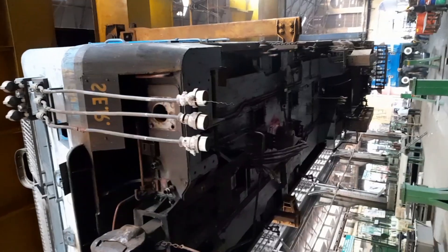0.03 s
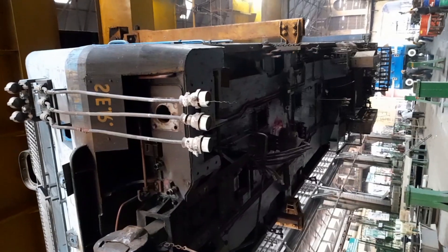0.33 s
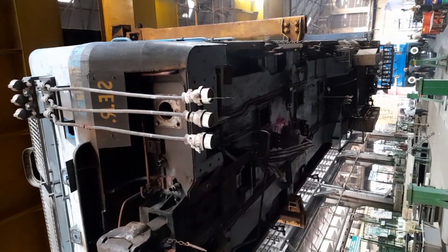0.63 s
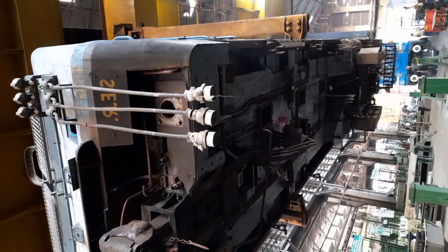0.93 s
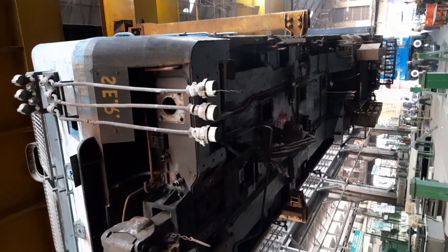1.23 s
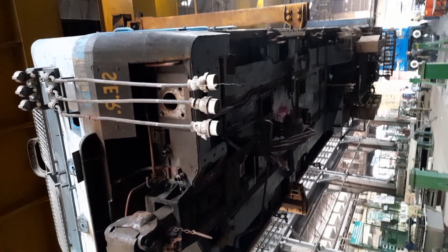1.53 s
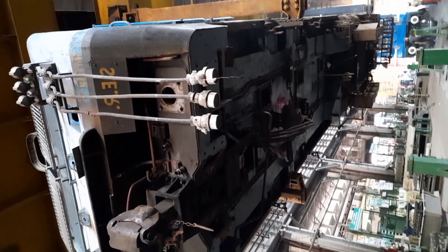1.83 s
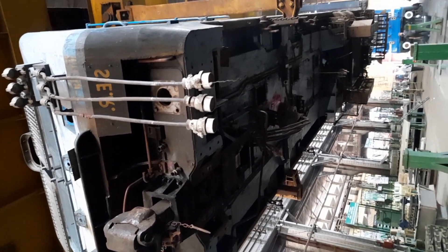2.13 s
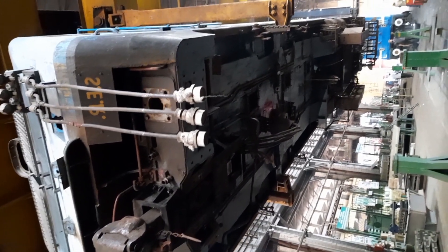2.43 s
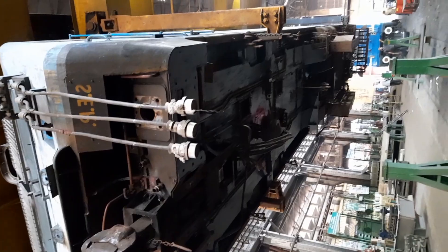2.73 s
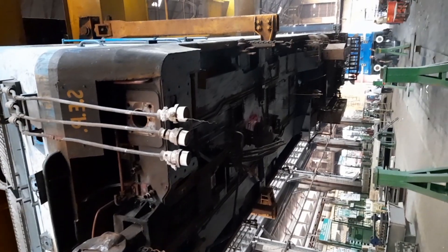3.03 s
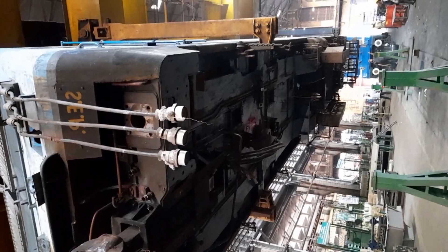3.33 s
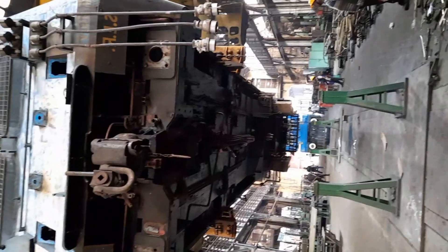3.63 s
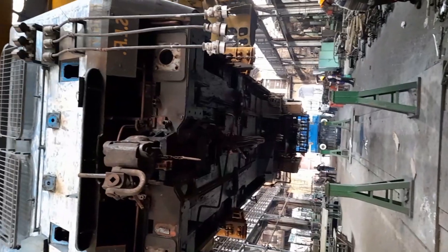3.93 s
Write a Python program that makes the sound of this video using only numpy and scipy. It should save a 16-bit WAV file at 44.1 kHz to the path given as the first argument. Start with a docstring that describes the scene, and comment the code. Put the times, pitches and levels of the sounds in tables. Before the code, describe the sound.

A steady industrial rumble fills an echoing repair hall, under a rising crane drone, occasional steel booms and distant squeaks. Two double ticks snap close on the right, the sound briefly cuts out, then a coasting motor whines down.

```python
"""A large railway repair shed rumbles with machinery and a turning shaft hums throughout. A crane drive speeds
up in a rising drone; faint squeaks and hollow booms of heavy steel come and go, and two double ticks snap
close on the right. At 2.3 s the sound cuts out for an instant. Then a coasting motor whines down, swelling
as its partials sweep through the hall's resonances and smeared by its long echo, with one more squeak and
a last boom."""
import sys
import numpy as np
from scipy import signal
from scipy.fft import rfft, irfft
from scipy.io import wavfile
from scipy.ndimage import uniform_filter1d

SR = 44100
rng = np.random.default_rng(int(sys.argv[2]) if len(sys.argv) > 2 else 0)


def wav_record(signal):
    """Record a signal, one row per channel, as 16-bit PCM in the file named by sys.argv[1]."""
    frames = np.transpose(np.atleast_2d(signal))
    bounded = np.clip(frames, -1, 1)
    # unit amplitude maps onto the largest positive 16-bit level
    quanta = np.round(bounded * 32767).astype(np.int16)
    wavfile.write(sys.argv[1], SR, quanta)


N = 176400

CUT_S, RESUME_S, RESUME_FADE_S = 2.309, 2.3415, .007
# stereo width of the shed (frequency [Hz], left-right correlation [capped at 1 in use])
CORRELATION = [(60, 1.5), (130, 0.8), (290, 1.3), (640, 0.08), (1400, 0), (15000, 0)]
# stereo balance of the shed (frequency [Hz], left minus right [dB])
BALANCE = [(60, -7), (110, -0.5), (200, -4.5), (380, -6), (700, -2.5), (1300, -5), (2400, -7), (4400, -10),
           (6500, -9.5), (8500, 3), (11000, -1), (15000, 1)]
# colour of the rumble before and after the dropout (frequency [Hz], relative level [dB])
EARLY_COLOUR = [(20, -52), (32, -36), (42, -43), (56, -5.5), (78, -11.5), (110, -5), (155, -4),
                (200, -10.5), (250, -10.5), (320, -4.5), (360, -4.5), (400, -11.5), (500, -9), (620, -12),
                (960, -17.5), (1500, -19.5), (2050, -23.5), (2400, -22.5), (3200, -29), (4100, -29.5),
                (4800, -31), (6000, -31), (6600, -37), (7100, -45), (8100, -58), (9500, -50), (11300, -41),
                (15500, -42.5)]
LATE_COLOUR = [(20, -54), (32, -42), (45, -15), (62, -12), (78, -13), (108, -1.5), (150, -4), (215, -10),
               (300, -1), (415, -8), (540, -5.5), (725, -10), (1070, -15), (1300, -16.5), (1700, -14),
               (2100, -17), (2500, -21.5), (3300, -22.5), (4100, -25.5), (4800, -28), (5600, -25),
               (6500, -30), (7100, -39), (8100, -54.5), (9500, -48.5), (11600, -39), (15500, -41.5)]
# its swells, each band taken about its own mean
# (time [s], deep bass [dB], bass [dB], low mids [dB], mids [dB], treble [dB])
EARLY_SWELLS = [(0, -46, -29, -38, -44, -51.5), (.55, -41, -33.5, -35, -44.5, -50),
                (1.15, -45, -36.5, -34, -45, -51.5), (1.9, -49, -28.5, -34, -43.5, -50),
                (2.3, -38, -29, -35, -47, -52.5)]
LATE_SWELLS = [(2.35, -37, -23, -30, -26, -40.5), (2.849, -43, -22, -31.5, -28, -42.5),
               (3.35, -40, -18, -32, -28, -45), (4, -41, -17.5, -34, -29.5, -47)]
# those five bands (centre [Hz])
BAND_CENTRES = [55, 140, 400, 1400, 4500]
# far-off ringing metal, as peaks and a notch in the rumble (frequency [Hz], width [Hz], gain [dB])
METAL_RINGS = [(2470, 180, 4), (4160, 22, -10), (4020, 55, 5), (4320, 40, 4.5)]
# shaft hum (multiple of shaft speed, level before the dropout [dB], level after it [dB])
SHAFT_PARTIALS = [(4, -40, -42), (5, -58, -57), (6, -35, -30.5), (7, -39, -32), (8, -44, -44),
                  (10, -35.5, -36.5), (11, -37.5, -47), (12, -50, -38.5), (13, -36, -44.5),
                  (14, -41.5, -63), (15, -40, -41.5), (16, -39.5, -40.5), (17, -37, -70), (19, -50, -58)]
# swell on top of those levels (time [s], gain [dB])
HUM_SWELL = [(0, -2), (1.2, 2), (2.2, -3.5), (2.5, 1), (2.7, 2), (3.05, 1.5), (3.3, -3), (4, -6.5)]
# crane drive speeding up (time [s], pitch [Hz], fundamental [dB], octave [dB])
CRANE_RUN_UP = [(0, 129.2, -44, -57), (.5, 140, -31, -44), (0.95, 148, -29, -36), (1.248, 160.5, -31, -47),
                (1.5, 170, -57, -34.5), (1.62, 175.4, -35, -25.5), (1.72, 177.5, -31.5, -26),
                (1.82, 179.6, -40, -31), (1.9, 180.7, -28, -31), (2.07, 179, -30, -40),
                (2.298, 179, -50, -54)]
# reverb tail of the hall (frequency [Hz], time to fall 60 dB [s])
HALL_DECAY = [(100, 1.8), (1000, 1.58), (2500, 1.3), (6000, 1.39)]
# distant squeaks (time [s], pitch [Hz], length [s], level [dB])
FAR_SQUEAKS = [(.785, 4064, 0.038, -42), (1.015, 3677, 0.054, -38.5), (2.89, 4050, 0.06, -38)]
# booms of heavy steel (time [s], pitch [Hz], length [s], level [dB])
STEEL_BOOMS = [(1.08, 307.5, 0.14, -22.5), (2.06, 140.7, .2, -21), (2.15, 59.45, 0.077, -31),
               (2.33, 113.6, 0.066, -24), (3.76, 151, 0.19, -25.5)]
# close ticks (time [s], length [s], low mode [dB], high mode [dB])
CLOSE_TICKS = [(1.6820, 0.0049, -29, -14), (1.6884, .005, -22.5, -9), (1.9746, .0025, -14, -11),
               (1.9782, 0.0058, -9.5, -16), (1.986, 0.0063, -31, -30)]
# motor whine (multiple of its pitch, relative level [dB])
MOTOR_PARTIALS = [(1, 3), (2, 0.5), (3, 2), (4, 4.5), (5, -2), (6, -3), (7, -5.5), (8, -9.5), (10, -11),
                  (11, -14), (12, -19)]
# resonances of the hall that swell the whine, and a broad lift of the top partials near 5.6 kHz (frequency
# [Hz], width [Hz], boost [dB])
WHINE_RESONANCES = [(559, 14, 7), (497, 22, 8), (866, 20, 7), (920, 30, 5), (1020, 15, 4), (1085, 70, 7),
                    (1377, 30, 9), (1501, 28, 6), (1595, 50, 5), (1685, 85, 7), (1760, 45, 3.5),
                    (1870, 140, 5.5), (2020, 70, 4.5), (2115, 80, 7.5), (2245, 35, 5), (5600, 900, 6.5)]


def amp(db):
    """Decibels to gain."""
    return 10 ** (np.asarray(db) / 20)


def unit(x):
    """Scales to rms 1."""
    return x / np.sqrt(np.mean(x ** 2) + 1e-20)


def curve(points, hz):
    """Reads a table on a log-frequency axis."""
    f, value = np.transpose(points)
    return np.interp(np.log(hz + 1), np.log(f + 1), value)


def clock():
    """Time of every sample in seconds."""
    return np.arange(N) / SR


def add(mix, start_s, sound):
    """Lays a stereo sound into the mix."""
    part = mix[:, round(start_s * SR):][:, :sound.shape[1]]
    part += sound[:, :part.shape[1]]


def wander(rate_hz):
    """Smooth random modulation of rms 1, rolling off above rate_hz."""
    hz = np.fft.rfftfreq(2 * N, 1 / SR)
    return unit(irfft(rfft(rng.standard_normal(2 * N)) * np.exp(-(hz / rate_hz) ** 2))[:N])


def pan(left_db):
    """Left and right gains whose mean is 1; negative values lean right."""
    gains = np.array([amp(left_db / 2), amp(-left_db / 2)])
    return (gains / gains.mean(0))[..., None]


def diffuse_noise(gain, size):
    """Room noise shaped by gain(times, frequencies): narrow in the bass, wide above."""
    hop = size // 4
    t, hz = np.arange(N // hop + 5) * hop / SR, np.fft.rfftfreq(size, 1 / SR)
    a, b, c, d = rng.standard_normal((len(t), len(hz), 4)).T
    shared = np.clip(curve(CORRELATION, hz), -1, 1)[:, None]
    left = a + 1j * b
    right = shared * left + np.sqrt(1 - shared ** 2) * (c + 1j * d)
    spectra = np.array([left, right]) * pan(curve(BALANCE, hz)) * gain(t, hz)
    return signal.istft(spectra, nperseg=size, noverlap=size - hop)[1][:, :N]


def shed_rumble(colour, swells, level_db):
    """Distant machines, ringing metal and rushing air merge into a bed that swells band by band."""
    def gain(t, hz):
        times, *bands = np.transpose(swells)
        band_db = [np.interp(t, times, band - band.mean()) for band in bands] + [0 * t]
        centres = [*BAND_CENTRES, 25000]  # the swells taper off toward this extra, steady band
        crossfades = np.array([curve(list(zip(centres, row)), hz) for row in np.eye(len(centres))])
        swell_db = crossfades.T @ np.array(band_db)
        grain = uniform_filter1d(rng.standard_normal((len(t), len(hz))), size=9, axis=0)
        patches_db = unit(uniform_filter1d(grain, size=24, axis=1)).T
        flutter_db = .74 * np.interp(t, clock(), wander(rate_hz=10.7))
        rings_db = sum(db / (1 + (2 * (hz - f) / width) ** 2) for f, width, db in METAL_RINGS)
        colour_db = curve(colour, hz) + rings_db
        return amp(colour_db[:, None] + swell_db + patches_db + flutter_db)
    return amp(level_db) * unit(diffuse_noise(gain, size=4096))


def shaft_hum(speed_hz=16.51, drift=.002, waver=.25):
    """A steadily turning shaft hums at multiples of its speed, each wavering in strength."""
    turns = np.cumsum(speed_hz * (1 + drift * wander(rate_hz=2.14))) / SR
    out = np.zeros((2, N))
    for k, early_db, late_db in SHAFT_PARTIALS:
        level = amp(np.where(clock() < RESUME_S, early_db, late_db)) * (1 + waver * wander(rate_hz=3.3))
        partial = np.sqrt(2) * np.sin(2 * np.pi * (k * turns + rng.random()))
        out += pan(curve(BALANCE, k * speed_hz)) * level * partial
    return out * amp(np.interp(clock(), *np.transpose(HUM_SWELL)))


def crane_drive(jitter=.0081, waver=.54, wet=.52):
    """The drive speeds up: an uneven rising drone and its octave, heard partly through the hall."""
    times, *columns = np.transpose(CRANE_RUN_UP)
    hz, fundamental_db, octave_db = (np.interp(clock(), times, column) for column in columns)
    phase = 2 * np.pi * np.cumsum(hz * (1 + jitter * wander(rate_hz=19.8))) / SR
    drone = sum(amp(db) * (1 + waver * wander(rate_hz=10)) * np.sin(k * phase)
                for k, db in ((1, fundamental_db), (2, octave_db)))
    return pan(left_db=-5) * drone + wet * hall_reverb(drone)


def hall_reverb(x):
    """The long diffuse echo of the shed, hanging longest in the bass."""
    tail = diffuse_noise(lambda t, hz: amp(-60 * t / curve(HALL_DECAY, hz)[:, None]), size=512)
    return signal.fftconvolve(x[None], unit(tail) / np.sqrt(N), axes=1)[:, :len(x)]


def steel_resonances(events, left_db):
    """Steel resonances swell and die away: high ones squeak, low ones boom."""
    out = np.zeros((2, N))
    for start_s, hz, length, db in events:
        t = np.arange(0, length, 1 / SR)
        envelope = amp(db) * np.sin(np.pi * t / length)
        add(out, start_s, pan(left_db) * envelope * np.sin(2 * np.pi * hz * t))
    return out


def ticks(modes_hz=(1900, 2300, 4270), attack_s=.00074, snap_decay_s=.0027):
    """A tiny snap rings two modes and a thin overtone for a few cycles, close on the right."""
    snap_band = signal.butter(5, [3000, 6000], "band", fs=SR, output="sos")
    out = np.zeros((2, N))
    for start_s, length, low_db, high_db in CLOSE_TICKS:
        t = np.arange(0, length, 1 / SR)
        low, high, overtone = (np.sin(2 * np.pi * hz * t) for hz in modes_hz)
        ring = amp(low_db) * (low + amp(-19.5) * overtone) - amp(high_db) * high
        envelope = np.minimum(t / attack_s, 1) * (1 - t / length) ** .75
        noise = unit(signal.sosfilt(snap_band, rng.standard_normal(N)))[:len(t)]
        snap = .12 * amp(max(low_db, high_db)) * noise * np.exp(-t / snap_decay_s)
        add(out, start_s, pan(left_db=-17) * (ring * envelope + snap))
    return out


def motor_whine(start_hz=561.8, slowing_per_s=.187, jitter=.00205, echo_lag_s=.045, wet=.7):
    """A coasting motor's partials sweep through the hall's resonances; its echo smears each one."""
    t = clock() - RESUME_S
    hz = start_hz * np.exp(-slowing_per_s * t) * (1 + jitter * wander(rate_hz=27))
    turns = np.cumsum(hz) / SR
    echo_ratio = np.exp(slowing_per_s * echo_lag_s)  # the echo still carries the earlier, higher pitch
    out = np.zeros((2, N))
    for k, db in MOTOR_PARTIALS:
        echo_hz = k * hz * echo_ratio
        boost_db = sum(peak * np.exp(-(2 * (echo_hz - f) / width) ** 2)
                       for f, width, peak in WHINE_RESONANCES)
        phase = 2 * np.pi * (k * turns + rng.random())
        direct = .53 / (1 + (k / 7.5) ** 4) * np.sin(phase)  # top partials arrive almost only as echo
        a, b, c, d = (wander(rate_hz=12 + 10 * k) for _ in range(4))
        smear = np.array([a + 1j * b, c + 1j * d]) / np.sqrt(2)
        echo = pan(curve(BALANCE, k * start_hz)) * (smear * np.exp(1j * phase * echo_ratio)).real
        out += amp(db + boost_db) * (pan(left_db=-20) * direct + wet * echo)
    return out * amp(-34.5 - 2.5 * t)  # fades 2.5 dB a second


def scene():
    """Rumble, hum and steel throughout; crane and ticks before the dropout, the motor after it."""
    early = shed_rumble(EARLY_COLOUR, EARLY_SWELLS, level_db=-23) + crane_drive()
    late = shed_rumble(LATE_COLOUR, LATE_SWELLS, level_db=-22.5) + motor_whine()
    squeaks = steel_resonances(FAR_SQUEAKS, left_db=-15)
    booms = steel_resonances(STEEL_BOOMS, left_db=-4.5)
    return np.where(clock() < RESUME_S, early, late) + shaft_hum() + squeaks + booms + ticks()


def record(dry):
    """The sound cuts out, a faint remnant dies away, and it fades back in; the very top is rolled off."""
    t = clock()
    remnant = amp(-12.5) * np.exp(-abs(t - CUT_S) / .0042)
    fade_in = np.clip((t - RESUME_S) / RESUME_FADE_S, 0, 1)
    gate = np.where(t < CUT_S, 1, remnant + fade_in)
    lowpass = signal.firwin(511, cutoff=15700, window=("kaiser", 9), fs=SR)
    return signal.oaconvolve(dry * gate, lowpass[None], "same")


dry = scene()
out = record(dry)
wav_record(out)
```